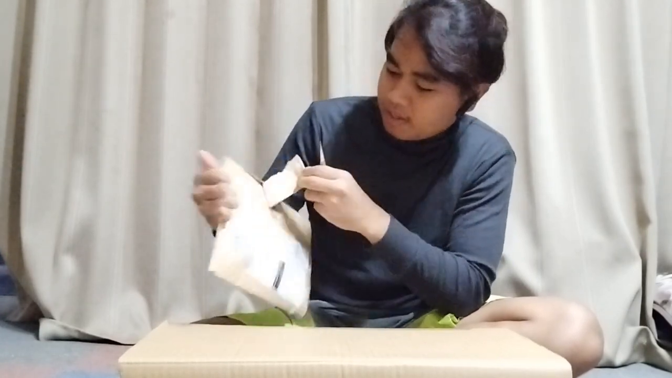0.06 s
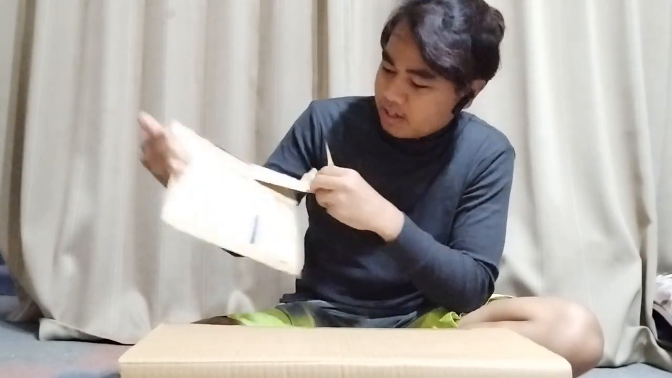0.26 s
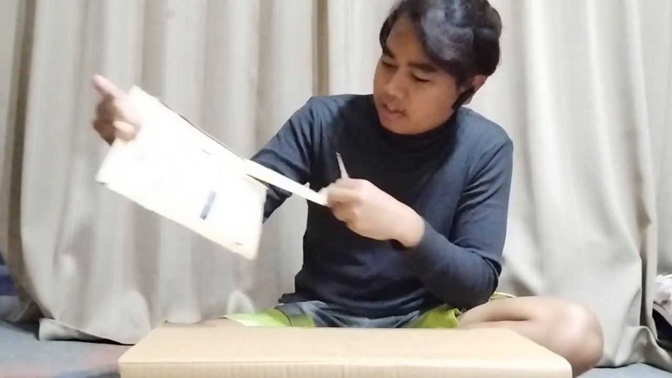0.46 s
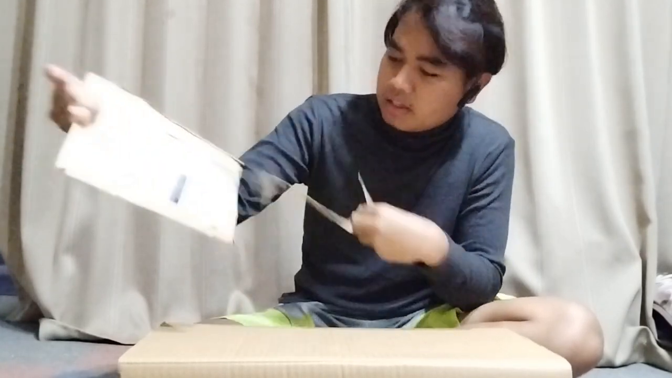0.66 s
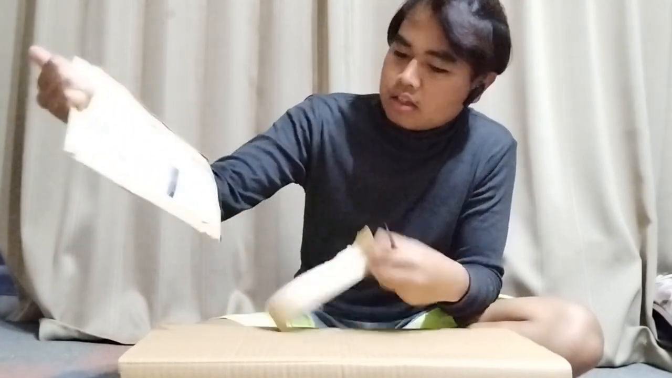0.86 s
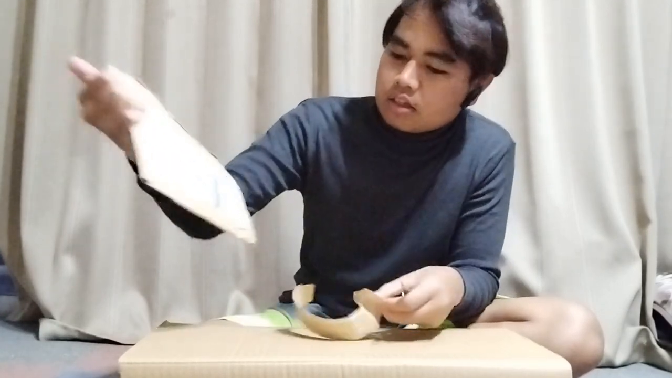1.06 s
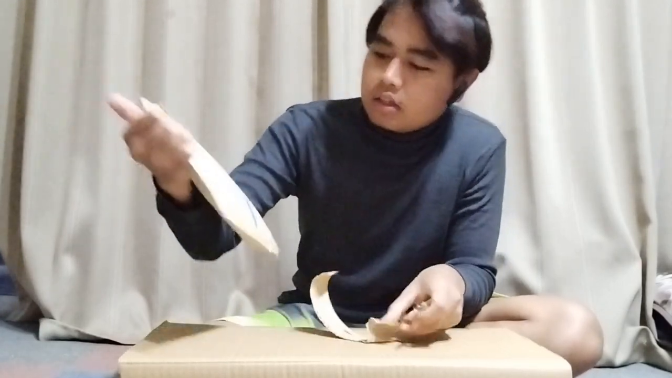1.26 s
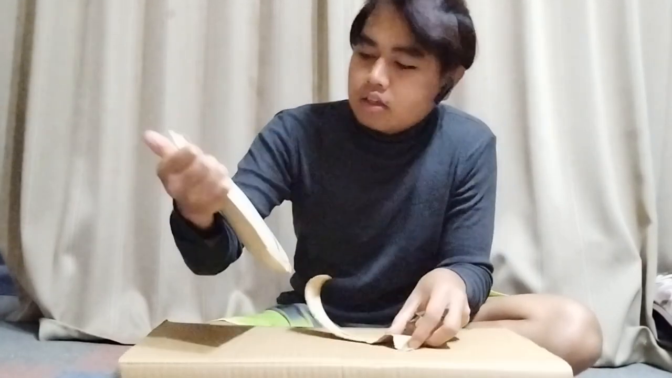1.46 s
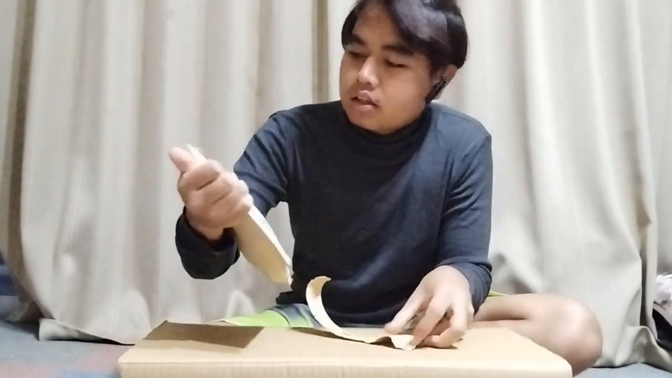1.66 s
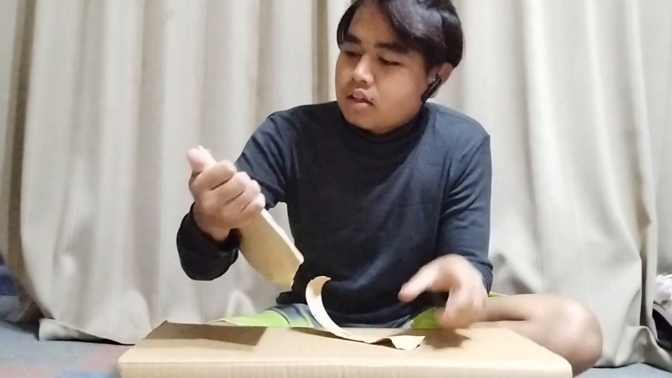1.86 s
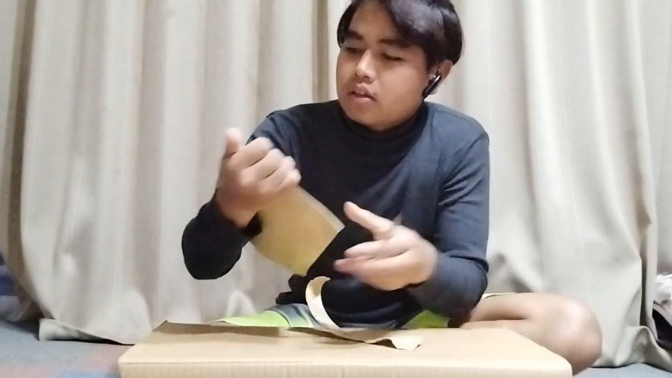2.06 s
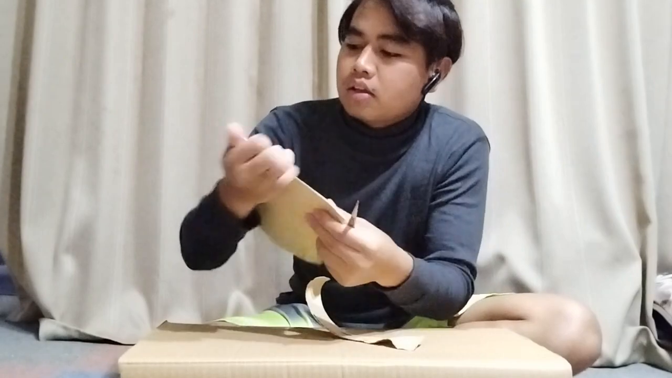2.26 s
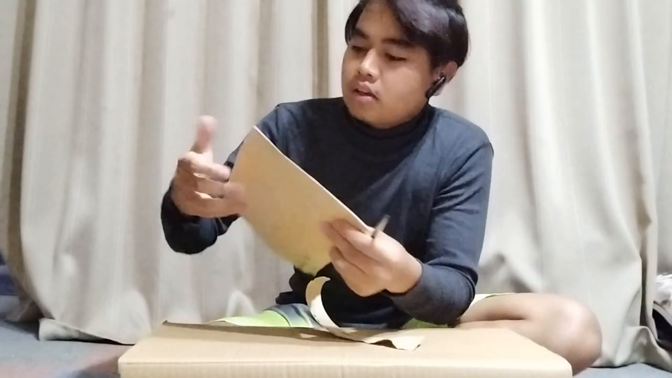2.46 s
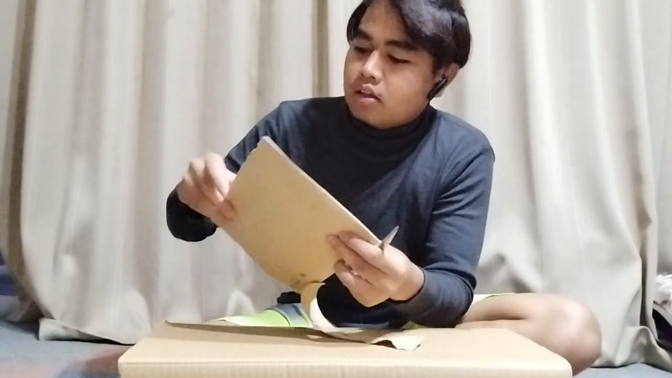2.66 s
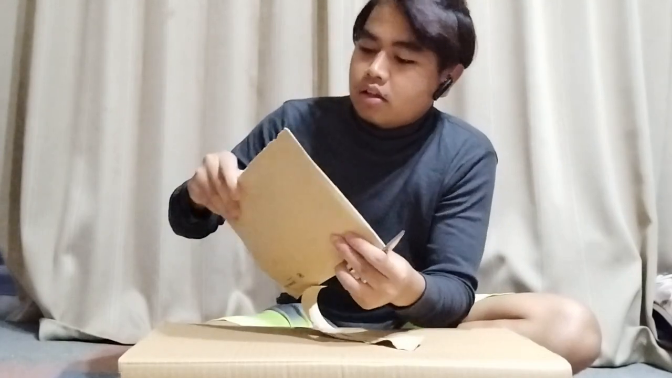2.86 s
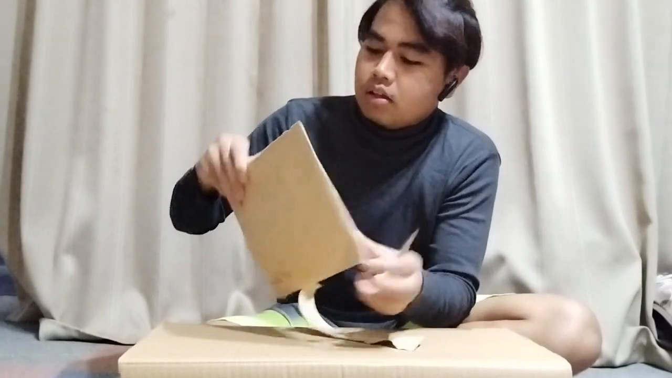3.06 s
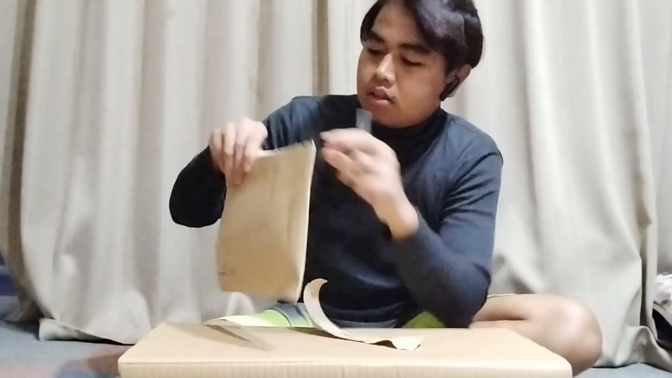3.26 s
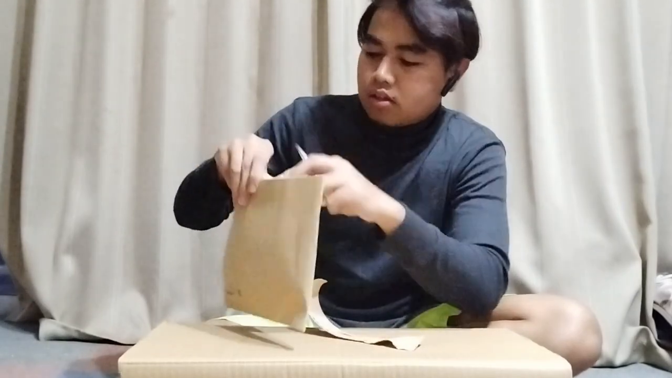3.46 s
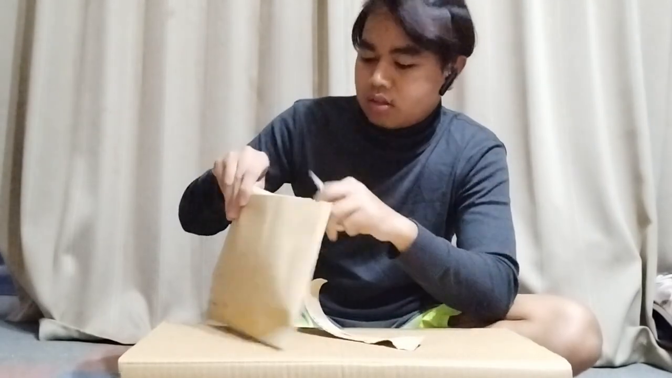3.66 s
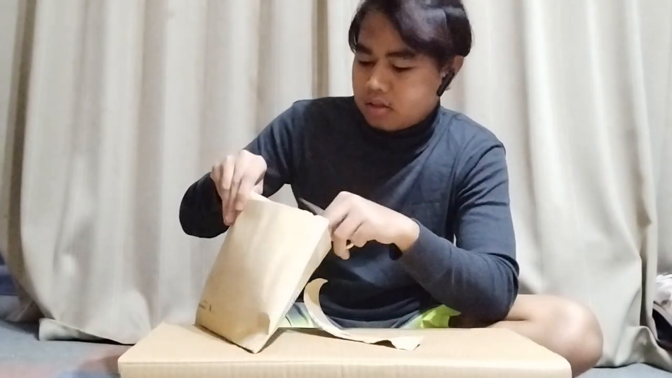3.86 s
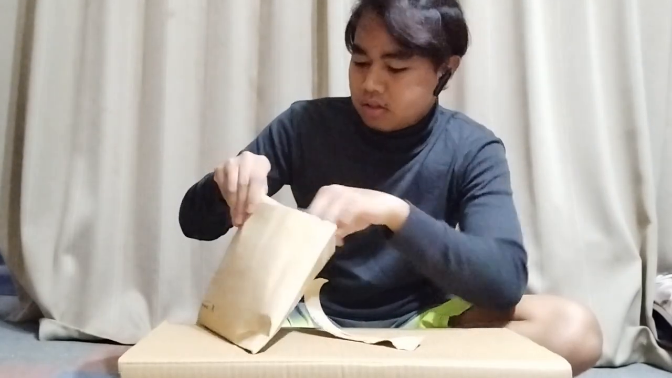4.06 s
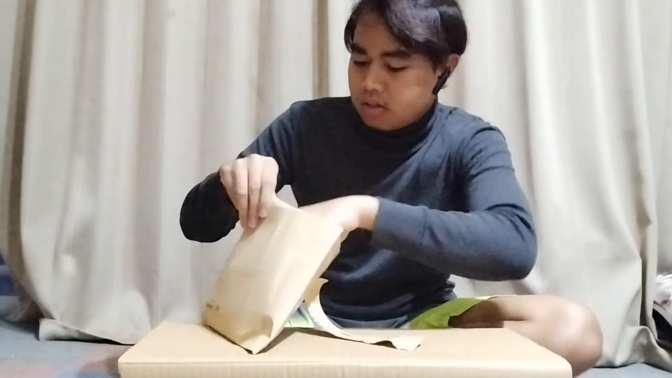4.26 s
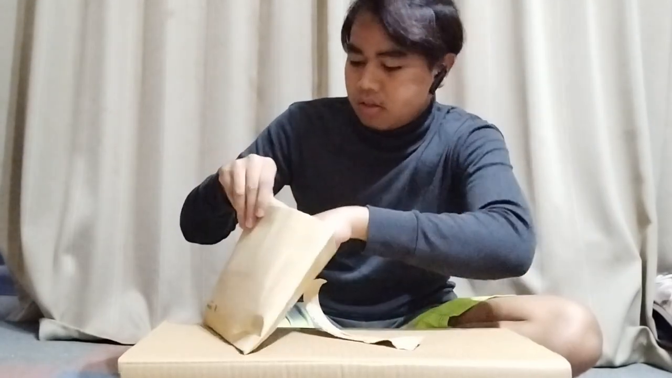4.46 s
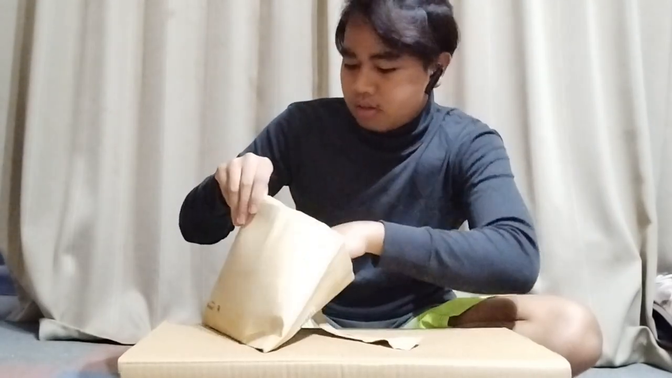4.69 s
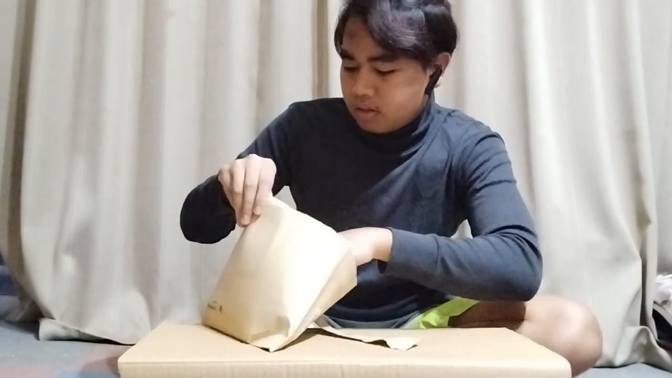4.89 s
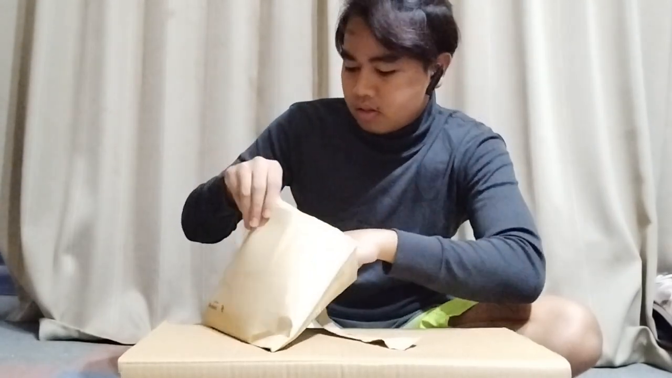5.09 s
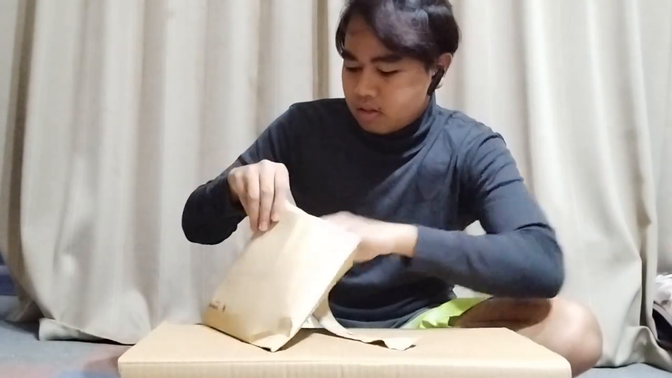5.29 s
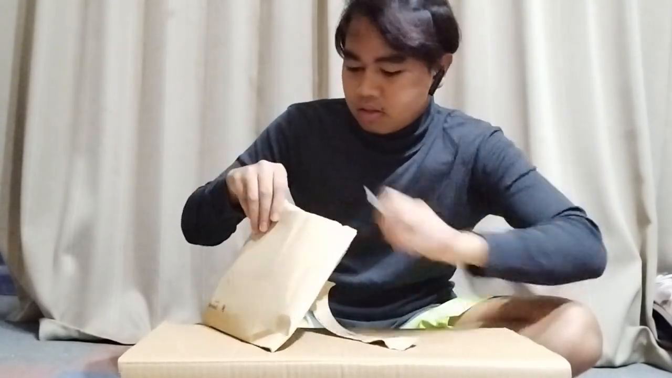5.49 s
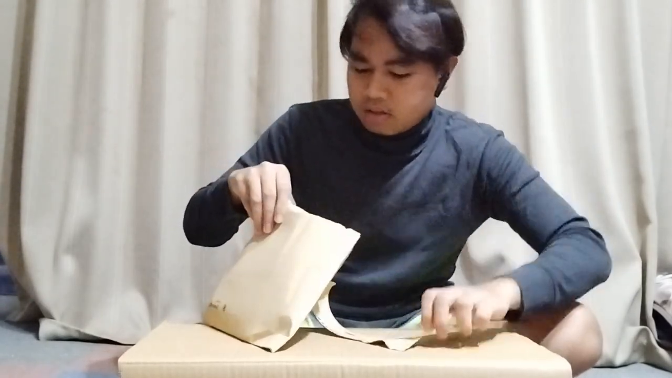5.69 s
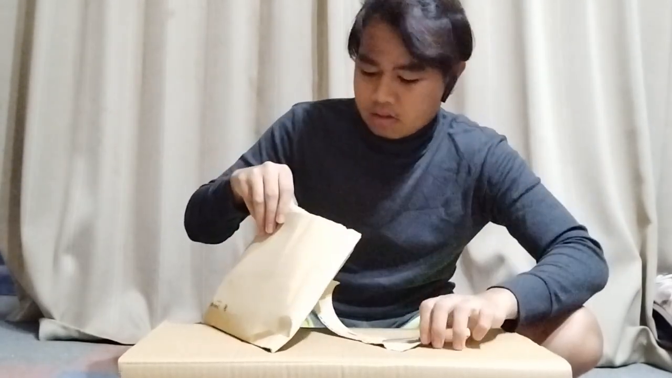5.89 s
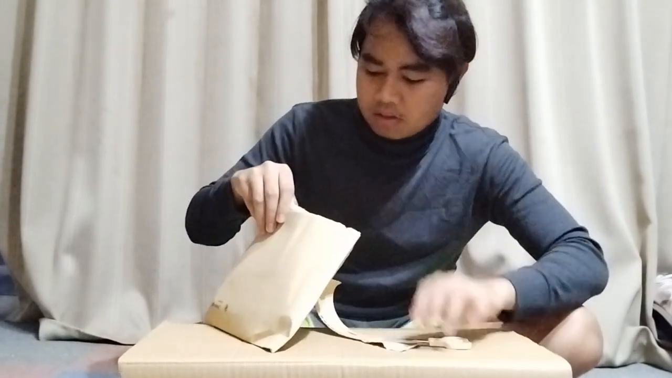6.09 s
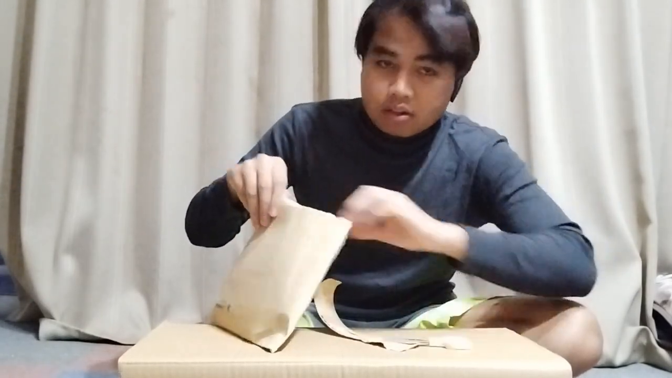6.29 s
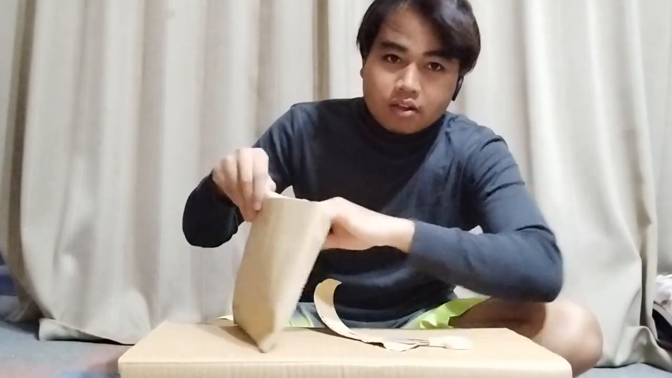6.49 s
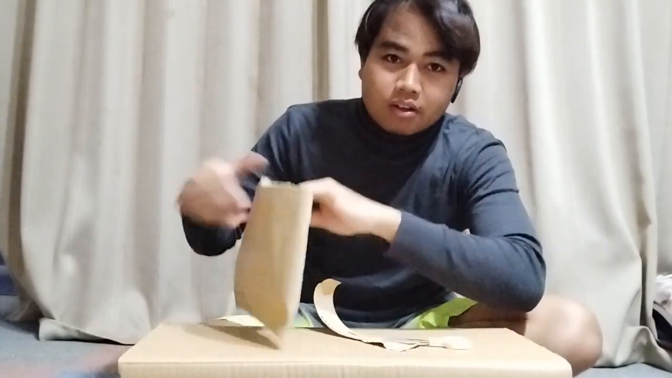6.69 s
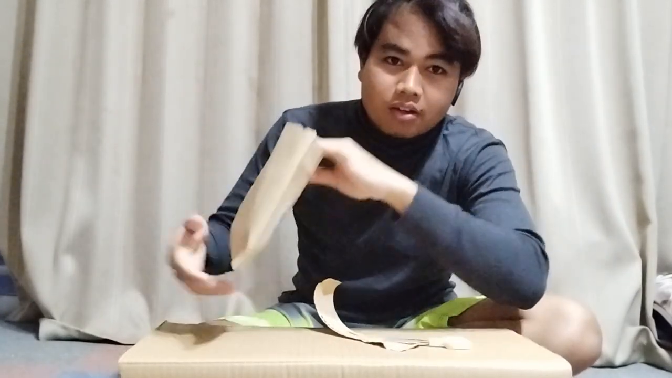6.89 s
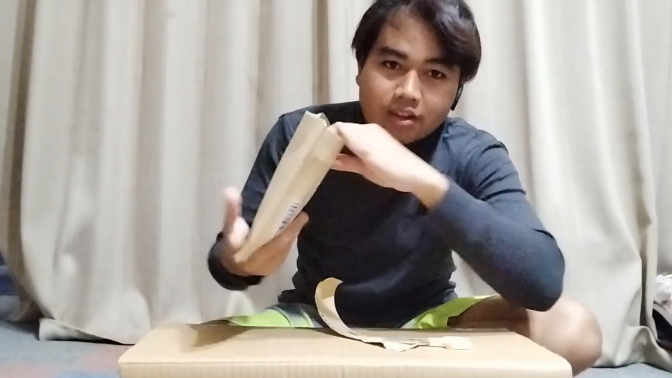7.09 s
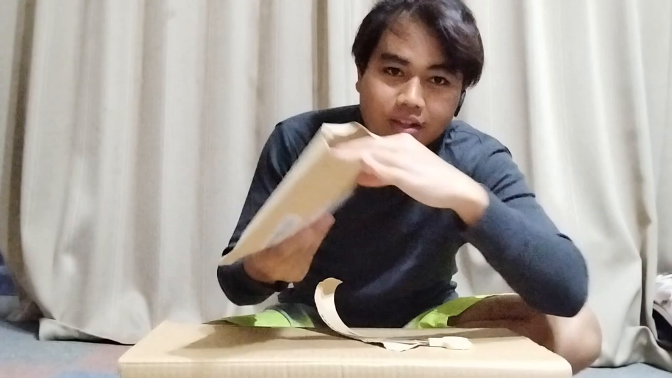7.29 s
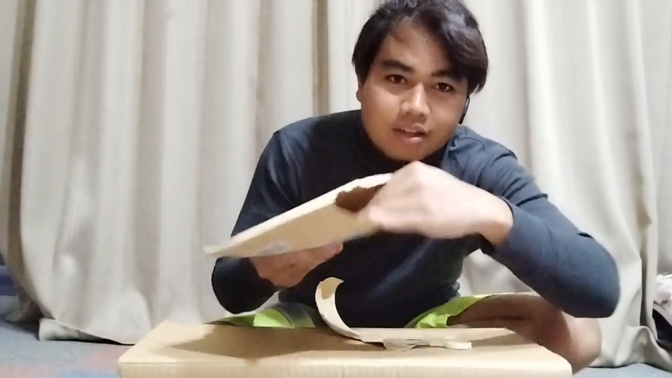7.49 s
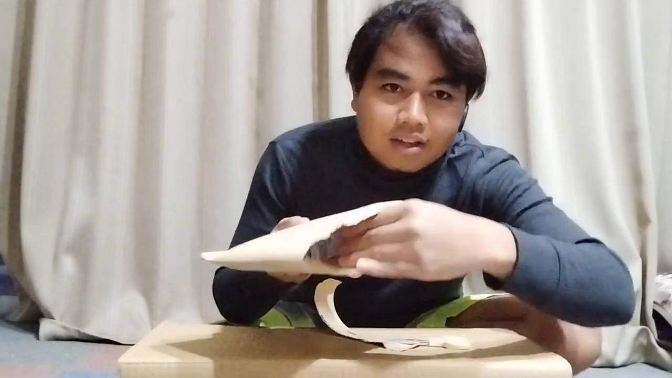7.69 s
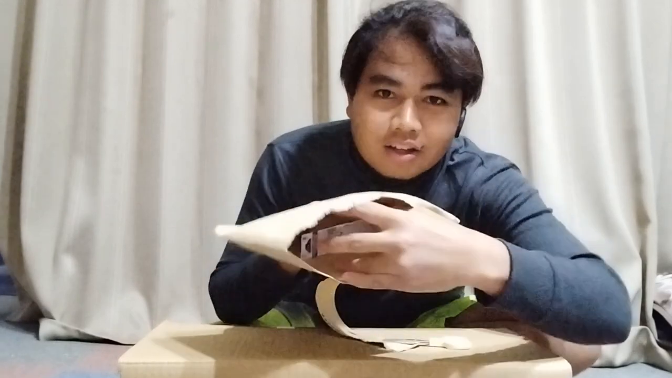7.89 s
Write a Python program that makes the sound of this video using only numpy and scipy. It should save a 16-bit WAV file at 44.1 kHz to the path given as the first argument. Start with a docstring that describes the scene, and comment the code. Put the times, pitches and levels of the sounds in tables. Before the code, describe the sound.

Cardboard envelope torn open in a small curtained room, followed by sparse papery rustles, sharp creasing snaps and hollow knocks on a carton.

```python
"""A small curtained room: a strip is torn off a stiff cardboard mailer, then hands turn, pry and search it.
Random fibre breaks, coloured by filters, make the fizz, panel rattle and flap rumble of the card.
Damped bursts make the crease snaps, uneven slips ring the crinkles, and short pushes ring a box
that serves as a table when a small tool knocks on it. Sparse noise tails give the room's brief ring.
Drifting air noise and wavering sines make the soft background with its appliance hum."""
import sys
import numpy as np
from scipy import signal
from scipy.fft import rfft, irfft
from scipy.io import wavfile
from scipy.ndimage import uniform_filter1d

SR = 44100
rng = np.random.default_rng(int(sys.argv[2]) if len(sys.argv) > 2 else 0)


def transcribe(u):
    """Save the signal u as a 16-bit wav file named by the first command-line argument.

    u: samples, shape (n,) or (channels, n), limited to [-1, 1]; the rate is SR.
    q: integer samples, one column per channel.
    """
    v = np.clip(np.atleast_2d(u).T, -1, 1)
    q = np.round(v * 32767).astype(np.int16)
    wavfile.write(sys.argv[1], SR, q)


N = 350154

# Pull on the strip as it rips: t/s, fibre fizz level/dB
TEAR_PULL = [(0.0, -65.5), (0.03, -56), (0.076, -45.5), (0.122, -44.5), (0.188, -41), (0.328, -43),
             (0.526, -42), (0.6, -44), (0.726, -36.5), (0.79, -55)]
# Hand strokes that slide over and crumple the card: t/s, length/s, fizz level/dB, rattle level/dB
HAND_STROKES = [(1.221, 0.011, -45, -54), (1.435, 0.054, -59.5, -69), (1.495, 0.053, -79, -60),
                (1.613, 0.0068, -55.5, -60), (1.732, 0.018, -66.5, -67), (1.86, 0.012, -70.5, -76),
                (2.1, 0.066, -73, -75), (2.36, 0.066, -62, -56), (2.772, 0.034, -65, -66),
                (2.905, 0.097, -71, -62.5), (3.114, 0.019, -57.5, -57.5), (3.25, 0.18, -74, -74),
                (3.51, .015, -70, -60), (3.544, 0.011, -56, -57), (3.713, 0.079, -63, -56),
                (3.944, 0.0074, -57.5, -52.5), (4.044, 0.042, -68.5, -60.5), (4.199, 0.28, -64.5, -57.5),
                (4.458, 0.021, -52.5, -51), (4.568, 0.013, -60, -59), (4.69, 0.13, -55.5, -51.5),
                (5.127, 0.11, -74, -65), (5.372, 0.024, -58, -53.5), (5.853, 0.027, -66, -60),
                (5.918, 0.024, -64.5, -59), (6.013, 0.016, -65.5, -62), (6.118, 0.0077, -76, -67),
                (6.36, 0.021, -68.5, -58.5), (6.46, 0.15, -71, -67), (6.73, 0.0098, -74, -69),
                (7.125, 0.013, -63.5, -59), (7.205, 0.054, -61.5, -58), (7.331, 0.037, -56.5, -51.5),
                (7.483, 0.053, -68.5, -67), (7.58, .04, -58.5, -60.5), (7.68, 0.18, -66.5, -64.5),
                (7.892, .05, -60.5, -58)]
# Colour of breaking fibres: f/Hz, relative level/dB
FIZZ_COLOUR = [(1760, -48), (3000, -8), (6170, -6.5), (7560, -2), (8640, -3), (9660, -1), (12300, -11),
               (15100, -10.5), (16000, -47)]
# Colour of the rattling panels: f/Hz, relative level/dB
RATTLE_COLOUR = [(290, -30), (500, -2), (601, -12.5), (749, -3.5), (917, -7.5), (1680, -8), (2220, -10),
                 (4500, -20), (5850, -28), (9900, -120)]
# Colour of the shaking flap: f/Hz, relative level/dB
RUMBLE_COLOUR = [(41, -31), (70, -13), (108, -4), (163, -16.5), (204, -7.5), (269, -10), (344, -5),
                 (900, -12.5), (1170, -15), (1980, -120)]
# Creases that snap: t/s, crack peak level/dB, pop peak level/dB, pop f/Hz, thump peak level/dB
CREASE_SNAPS = [(0.8748, -19.5, -33.5, 2270, -40), (0.976, -37, -50, 1140, -51),
                (1.061, -45, -43.5, 970, -53), (1.1154, -34.5, -39.5, 1630, -45),
                (1.157, -34, -37, 1630, -52), (1.285, -27, -38.5, 2040, -56), (1.3582, -60, -50, 1530, -63),
                (2.2689, -45, -35.5, 1120, -43), (2.2884, -43.5, -37, 1330, -40),
                (2.8195, -49, -42, 2380, -46), (2.885, -48, -47, 1210, -50), (2.9286, -51, -37, 1390, -55),
                (3.6052, -41, -28.5, 1970, -29), (3.714, -46, -50, 1580, -42),
                (3.9466, -30.5, -30, 1010, -33.5), (4.2765, -47, -56, 1000, -28.5),
                (4.4064, -40, -36, 1820, -46), (4.5435, -59, -38, 1200, -37), (4.8048, -19, -25, 1170, -31),
                (4.9382, -26, -34, 1220, -39.5), (5.336, -58, -38.5, 1230, -36),
                (6.5533, -33, -36.5, 1300, -43.5), (6.606, -44.5, -42, 1080, -41.5),
                (6.736, -52, -45, 1750, -59), (7.0355, -49, -68, 1570, -58), (7.161, -39, -42, 3100, -44.5),
                (7.281, -39, -40.5, 1380, -52), (7.415, -39, -40, 2280, -53),
                (7.5682, -55, -39.5, 2510, -47)]
# Facets of card that buckle many times in a row: t/s, length/s, f/Hz, rms level/dB
FACET_CRINKLES = [(0.052, 0.11, 1440, -52), (.53, 0.036, 2070, -52), (1.116, 0.015, 546, -53),
                  (1.157, 0.025, 542, -57), (1.116, 0.11, 1640, -66), (2.42, 0.057, 900, -64),
                  (2.927, 0.023, 1410, -58), (4.408, 0.018, 1810, -54.5), (5.372, 0.056, 3160, -64),
                  (7.28, 0.017, 4450, -60), (7.567, 0.032, 2510, -62.5), (7.73, 0.034, 3120, -69),
                  (7.901, 0.02, 3100, -66)]
# Tool blows on the box: t/s, ring peak level/dB, contact time/ms, click peak level/dB
TOOL_KNOCKS = [(1.489, -36.5, 0.44, -52), (1.515, -39, 0.72, -62), (1.615, -31, 0.16, -31.5),
               (5.825, -52, 0.27, -40), (5.863, -30.5, 0.49, -41), (6.007, -21.5, 0.59, -48),
               (6.113, -32, 0.11, -52), (6.129, -29, 0.2, -53)]
# Ringing modes of the box: f/Hz, relative level/dB, 60 dB decay time/s
BOX_MODES = [(210, -15, 0.09), (335, -10.5, 0.17), (340, 3, 0.083), (412, -4, 0.073), (534, 5, 0.028),
             (617, -2, 0.058), (735, 3.5, 0.036), (966, -4, 0.063), (1190, -10, 0.034), (1493, -2.5, 0.022),
             (1740, -6.5, 0.018), (2140, -12, 0.016)]
# Room decay: f/Hz, 60 dB decay time/s
ROOM_DECAY = [(150, 0.21), (660, 0.26), (1740, 0.35), (4600, 0.21), (12000, 0.12)]
# What the curtained walls send back: f/Hz, relative level/dB
WALL_RETURN = [(200, 8), (1000, -1.5), (4000, 4), (12000, 6.5)]
# Likeness of diffuse sound in the two channels: f/Hz, likeness (0 to 1)
STEREO_LIKENESS = [(30, 0.57), (100, 0.86), (300, 0.92), (700, 0.44), (1500, 0.12), (3000, 0.057)]
# Lag of direct sound in the right channel: f/Hz, phase/rad
RIGHT_LAG = [(0, 0), (4000, 1.7), (6000, 3.1), (8800, 6.3), (11000, 6.7), (22050, 14)]
# Colour of the air noise: f/Hz, relative level/dB
AIR_COLOUR = [(15, 3), (30, -6.5), (50, -13), (100, -7), (170, -14.5), (250, -16), (500, -17.5),
              (800, -25.5), (1400, -30.5), (3000, -41), (6000, -49.5), (9500, -47.5), (16000, -56)]
# Partials of the motor hum before they waver: f/Hz, rms level/dB
HUM_PARTIALS = [(71.8, -52), (143, -64), (214.5, -65), (350, -71.5)]

AIR_DB = -51.5  # rms
# Above this pull the rattle gains extra level: GROWTH more dB for each dB of pull
RATTLE_DB, RATTLE_FROM_DB, RATTLE_GROWTH = -2, -43, 1.29
FLAP_S, FLAP_LENGTH_S, FLAP_DB = 0.2, 0.51, -40  # the freed flap shakes
RISE_DB_PER_S, FALL_DB_PER_S = 293, 231  # into and out of each stroke
CRACK_HZ, THUMP_HZ, CLICK_HZ = 8700, 534, 7100
# After a snap the card rustles on, below crack and pop
SETTLE_FIZZ_DB, SETTLE_RATTLE_DB, SETTLE_DB_PER_S = -19, -15, 254
FAINT_CRACK_DB, SETTLE_SHARE = -41.5, 0.47  # cracks above the faint level carry over only in part
BAND_LIMIT_HZ = 15900


def friction():
    """Breaking fibres fizz and, with heavier jolts, rattle the panels; the jolts also shake the flap."""
    breaks = both_channels(fibres(per_s=4500, spread_db=1.5, clump_db=2.5), spread=3.6)
    jolts = both_channels(fibres(per_s=1500, spread_db=3.5, clump_db=1.0), spread=5.5)
    fizz_gain, rattle_gain, rumble_gain = effort()
    rattle_drive = evened(1.06 * breaks + jolts)
    fizz = signal.oaconvolve(breaks * fizz_gain, causal(FIZZ_COLOUR)[None])
    rattle = signal.oaconvolve(rattle_drive * rattle_gain, causal(RATTLE_COLOUR)[None])
    rumble = signal.oaconvolve(jolts * rumble_gain, causal(RUMBLE_COLOUR)[None])
    return (fizz + rattle + rumble)[:, :N]


def effort():
    """Gains of fizz, rattle and rumble: rip, strokes and settling add as powers; the flap drives the rumble."""
    t = np.arange(0, N + 64, 64) / SR
    pull_db = np.interp(t, *np.transpose(TEAR_PULL), left=-150, right=-150)
    firm_db = np.maximum(pull_db - RATTLE_FROM_DB, 0)
    power = gain_of([pull_db, pull_db + RATTLE_DB + RATTLE_GROWTH * firm_db]) ** 2
    for s, length, fizz_db, rattle_db in HAND_STROKES:
        power = power + level(t, s, length, [fizz_db, rattle_db]) ** 2
    for s, crack_db, pop_db, _, _ in CREASE_SNAPS:
        carried_db = FAINT_CRACK_DB + SETTLE_SHARE * (crack_db - FAINT_CRACK_DB)
        settle_db = [carried_db + SETTLE_FIZZ_DB, pop_db + SETTLE_RATTLE_DB]
        settling = (t > s) * level(t, s, 0, settle_db, fall_db_per_s=SETTLE_DB_PER_S)
        power = power + settling ** 2
    flap = level(t, FLAP_S, FLAP_LENGTH_S, [FLAP_DB], rise_db_per_s=127, fall_db_per_s=450)
    gains = (*np.sqrt(power), flap[0])
    return [np.interp(np.arange(N) / SR, t, gain) for gain in gains]


def fibres(per_s, spread_db, clump_db):
    """Tiny breaks at random moments, a few of them large, coming in clumps."""
    size_db = spread_db * np.minimum(rng.exponential(1, N), 5)
    size = gain_of(size_db) * rng.choice([-1., 1.], N)
    clumps = evened(uniform_filter1d(rng.standard_normal(N), size=300))
    return evened(size * (rng.random(N) < per_s / SR) * gain_of(clump_db * clumps))


def both_channels(x, spread):
    """Breaks spread over the card reach the right channel a few samples early or late."""
    at = np.arange(N) + np.round(spread * rng.standard_normal(N)).astype(int)
    return np.array([x, np.bincount(np.clip(at, 0, N - 1), x, N)])


def snaps():
    """A crease gives way: a bright crack, a pop of the panel and a thump of the hollow mailer."""
    out, fibre_colour = np.zeros(N), causal(FIZZ_COLOUR)[:150]
    draws = rng.standard_normal((len(CREASE_SNAPS), 3, 300))
    for (s, crack_db, pop_db, pop_hz, thump_db), noise in zip(CREASE_SNAPS, draws):
        add(out, s, burst(crack_db, CRACK_HZ, 0.4, 0.045, noise[0], fibre_colour))
        add(out, s, burst(pop_db, pop_hz, 1.0, 0.14, noise[1]))
        # the offset gives the thump a one-sided push; (1, -1) then takes its slope
        add(out, s, burst(thump_db, THUMP_HZ, 0.91, 0.11, 1.5 + noise[2], colour=(1, -1)))
    return out


def burst(db, hz, cycles, rough_ms, noise, colour=(1,)):
    """A ragged jolt, strongest around rough_ms, rings one pitch that fades by 1/e in the given cycles."""
    t = np.arange(3000) / SR
    ring = np.sin(2 * np.pi * hz * t) * np.exp(-t * hz / cycles)
    u = t[:len(noise)] * 1000 / rough_ms
    jolt = np.convolve(noise * u * np.exp(-u), colour)
    sound = np.convolve(jolt, ring)
    return gain_of(db) * sound / abs(sound).max()


def crinkles():
    """Uneven slips keep one facet ringing at its own pitch for a short spell."""
    out, t = np.zeros(N), np.arange(2500) / SR
    shape = (len(FACET_CRINKLES), 6000)
    slips = rng.standard_normal(shape) * (rng.random(shape) < 900 / SR)  # about 900 slips a second
    for (s, length, hz, db), slip in zip(FACET_CRINKLES, slips):
        spell = slip[:round(length * SR)]
        ring = np.sin(2 * np.pi * hz * t) * t * np.exp(-t * hz / 2.1)
        sound = signal.fftconvolve(spell * signal.windows.tukey(len(spell), .4), ring)
        rms = np.sqrt(np.sum(sound ** 2) / len(spell) + 1e-20)
        add(out, s, gain_of(db) * sound / rms)
    return out


def knocks():
    """A short push rings the box; a longer contact is duller, and each blow lands on another spot."""
    out, t = np.zeros(N), np.arange(9000) / SR
    draws = rng.standard_normal((len(TOOL_KNOCKS), 300))
    for (s, blow_db, contact_ms, click_db), noise in zip(TOOL_KNOCKS, draws):
        # the spot sets the level and phase of each mode
        spot_db, spot_phase = 1.5 * noise, .9 * noise[::-1]
        ring = sum(gain_of(db + d - 60 * t / t60) * np.sin(2 * np.pi * hz * t + p)
                   for (hz, db, t60), d, p in zip(BOX_MODES, spot_db, spot_phase))
        u = t[:300] * 1000 / contact_ms
        push = np.sin(np.pi * u) ** 2 * (u < 1)
        ring = np.convolve(ring, push)
        # the ring carries no deep bass
        ring = signal.lfilter(*signal.butter(2, 230, "high", fs=SR), ring)
        add(out, s, gain_of(blow_db) * ring / abs(ring).max())
        add(out, s, burst(click_db, CLICK_HZ, 0.8, 0.5, noise))
    return out


def room(x):
    """Three sparse decaying tails take turns, so the ring varies from sound to sound."""
    out, turn = np.zeros((2, N)), np.arange(N) / SR * 2.7
    for k in range(3):
        # one random-sign echo about every 20 samples
        taps = np.zeros((2, SR // 2))
        at = np.arange(60, SR // 2 - 20, 20) + rng.integers(0, 20, (2, 1))
        at = at + rng.integers(0, 10, at.shape)
        np.put_along_axis(taps, np.minimum(at, SR // 2 - 1), rng.choice([-1., 1.], at.shape), 1)
        hz, t, z = signal.stft(taps, SR, nperseg=512, noverlap=448)
        decay_db = read(WALL_RETURN, hz)[:, None] - 60 * t / read(ROOM_DECAY, hz)[:, None]
        spectrum = diffuse(z[0], z[1], hz) * gain_of(decay_db)
        tail = signal.istft(spectrum, SR, nperseg=512, noverlap=448)[1]
        share = np.sqrt(2 / 3) * np.cos(np.pi * (turn + k / 3))
        out += signal.fftconvolve((x * share)[None], tail / 18, axes=1)[:, :N]
    return out


def diffuse(z, other, hz):
    """Mixes two spectra into a diffuse stereo field, most alike in the bass."""
    same = np.clip(read(STEREO_LIKENESS, hz), 0, 1)[:, None]
    return np.array([z, same * z + np.sqrt(1 - same ** 2) * other])


def background():
    """Soft air noise with drifting patches, and a motor hum whose pitch and level waver."""
    frames, hz = N // 512 + 5, np.fft.rfftfreq(2048, 1 / SR)
    a, b, c, d, patches = rng.standard_normal((frames, 1025, 5)).T
    patches = uniform_filter1d(patches, size=16, axis=0)  # over frequency
    patches = evened(uniform_filter1d(patches, size=6, axis=1))  # over time
    air_gain = gain_of(read(AIR_COLOUR, hz)[:, None] + 1.22 * patches)
    z = diffuse(a + 1j * b, c + 1j * d, hz) * air_gain
    air = gain_of(AIR_DB) * evened(signal.istft(z, nperseg=2048, noverlap=1536)[1][:, :N])
    turns = np.cumsum(1 + 0.01125 * wander(rate_hz=3.0)) / SR  # one pitch drift shared by all partials
    hum = np.zeros(N)
    for k, (partial_hz, db) in enumerate(HUM_PARTIALS):
        # higher partials waver more in level
        partial_gain = np.sqrt(2) * gain_of(db + (0.2 + 0.49 * k) * wander(rate_hz=5.5))
        hum += partial_gain * np.sin(2 * np.pi * (partial_hz * turns + rng.random()))
    return air + hum


def wander(rate_hz):
    """Slow random drift of rms 1, from sines up to rate_hz."""
    t = np.arange(0, N + 256, 256) / SR
    slow = sum(np.sin(2 * np.pi * (f * t + rng.random())) / np.sqrt(f)
               for f in rate_hz * np.geomspace(.05, 1, 24))
    return np.interp(np.arange(N) / SR, t, evened(slow))


def gain_of(db):
    """Decibels to a factor."""
    return 10 ** (np.asarray(db) / 20)


def evened(x):
    """Scales to rms 1."""
    return x / np.sqrt(np.mean(x ** 2) + 1e-20)


def read(points, hz):
    """Reads a table of (Hz, value) on a log frequency axis."""
    f, value = np.transpose(points)
    return np.interp(np.log(hz + 1), np.log(f + 1), value)


def add(mix, s, sound):
    """Mixes a sound in at time s."""
    part = mix[round(s * SR):][:len(sound)]
    part += sound[:len(part)]


def causal(points):
    """Minimum-phase impulse response of a spectrum, floored at -70 dB, energy 1."""
    db = read(points, abs(np.fft.fftfreq(8192, 1 / SR)))
    log_gain = np.log(gain_of(np.maximum(db, -70)))
    taps = np.fft.ifft(np.exp(log_gain - 1j * signal.hilbert(log_gain).imag)).real[:3000]
    return taps / np.linalg.norm(taps)


def level(t, s, length, db, rise_db_per_s=RISE_DB_PER_S, fall_db_per_s=FALL_DB_PER_S):
    """Gain of one gesture: rise until s, hold for its length, fall."""
    rise_db = rise_db_per_s * np.maximum(s - t, 0)
    fall_db = fall_db_per_s * np.maximum(t - s - length, 0)
    return gain_of(np.array(db)[:, None] - rise_db - fall_db)


def scene():
    """Direct sound lags by frequency in the right channel; room and air are diffuse, the hum is central."""
    rubbing, blows = friction(), snaps() + knocks() + crinkles()
    left, right = rubbing + blows
    lag = np.interp(np.fft.rfftfreq(N, 1 / SR), *np.transpose(RIGHT_LAG))
    direct = np.array([left, irfft(rfft(right) * np.exp(-1j * lag), N)])
    room_send = gain_of(3.0) * rubbing[0] + gain_of(9.0) * blows
    return direct + room(room_send) + background()


def record(dry):
    """The left channel is 1.1 dB stronger; then a steep low-pass limits the band."""
    balanced = dry * gain_of([[.55], [-.55]])
    low_pass = signal.firwin(511, BAND_LIMIT_HZ, window=("kaiser", 9), fs=SR)
    return signal.oaconvolve(balanced, low_pass[None], "same")


dry = scene()
out = record(dry)
transcribe(out)
```